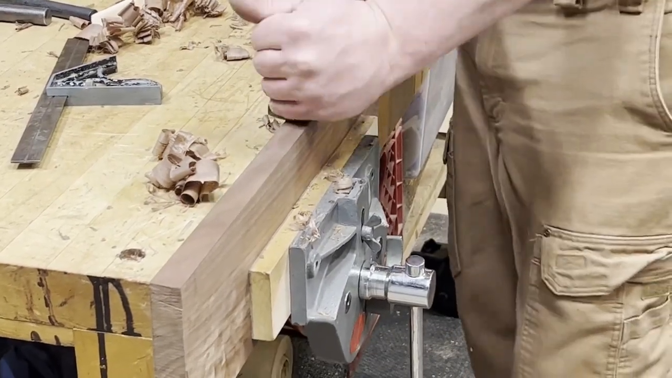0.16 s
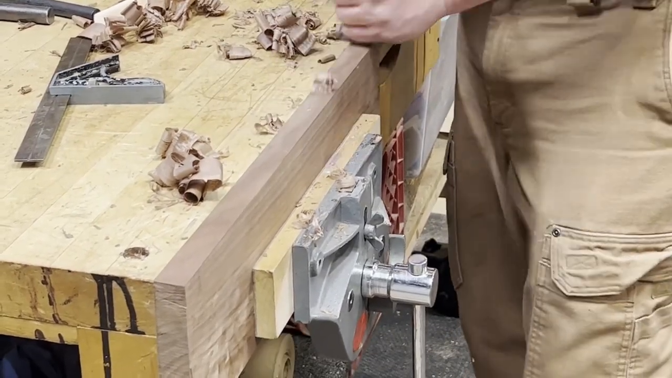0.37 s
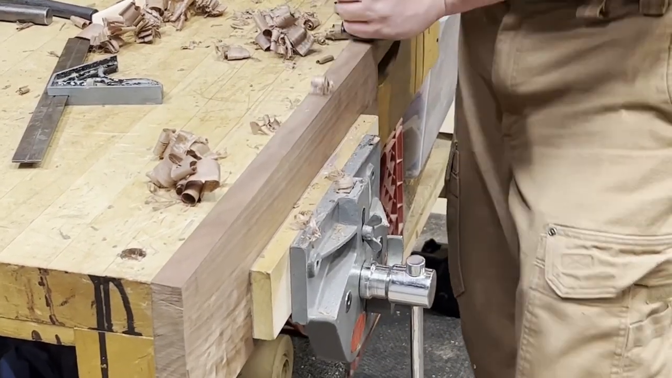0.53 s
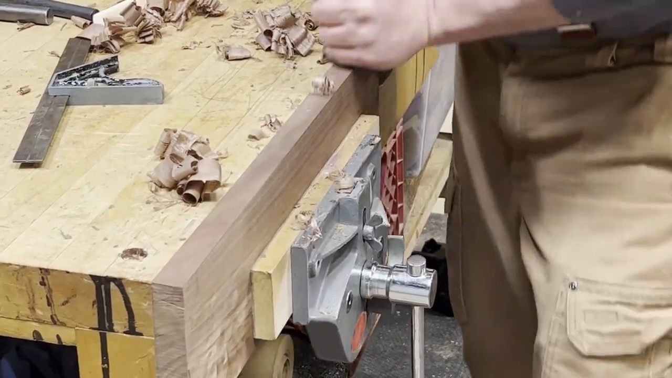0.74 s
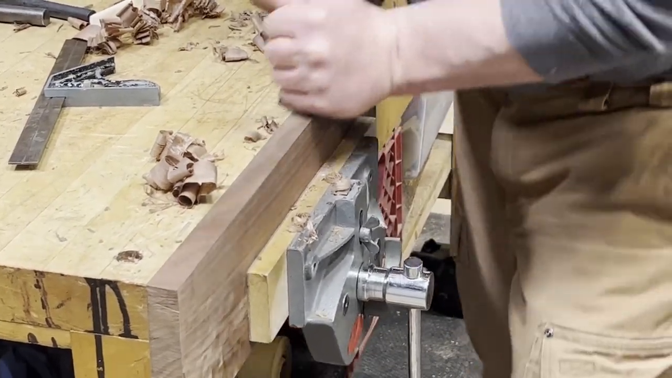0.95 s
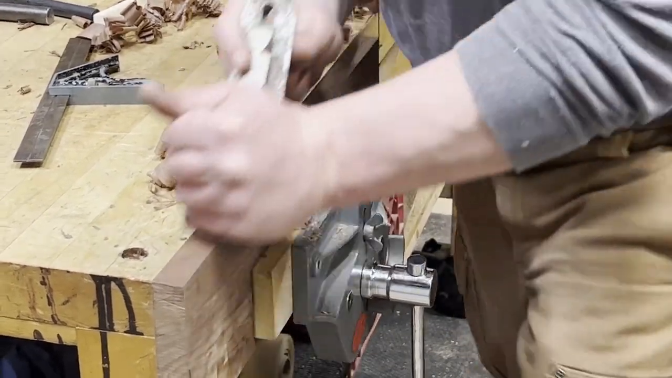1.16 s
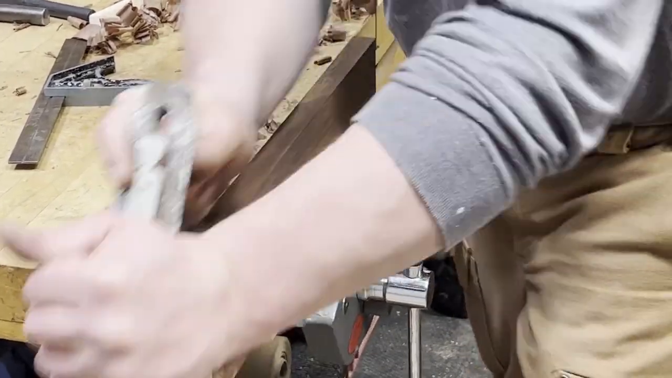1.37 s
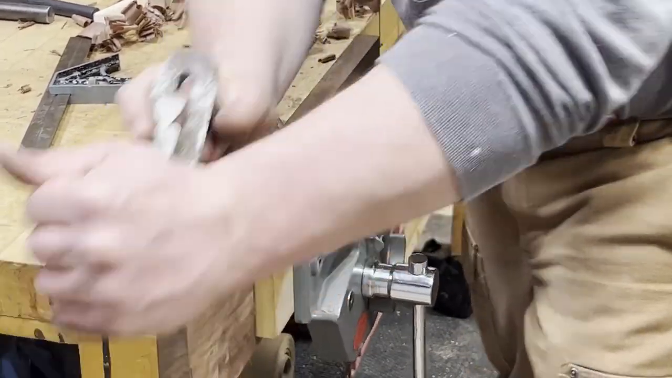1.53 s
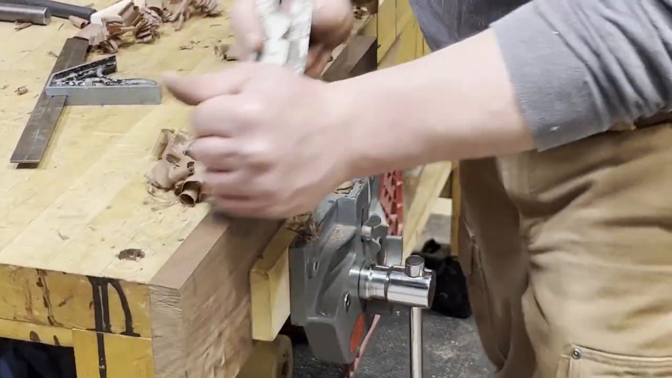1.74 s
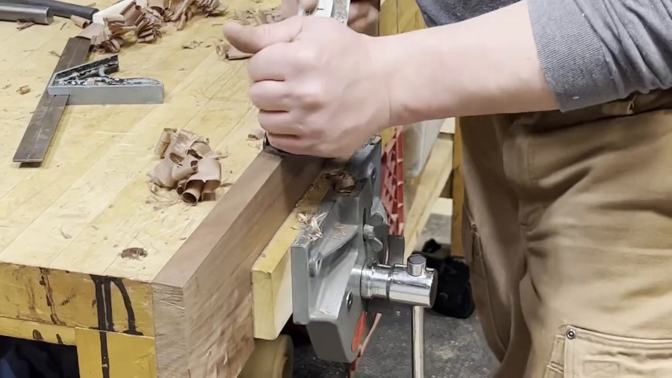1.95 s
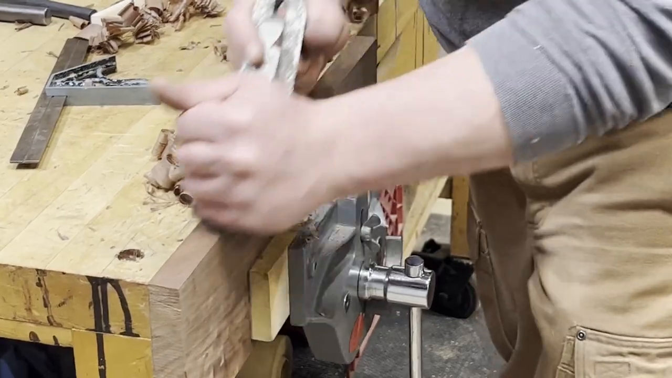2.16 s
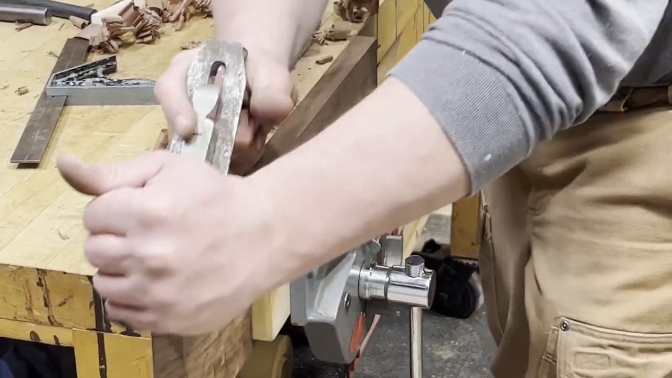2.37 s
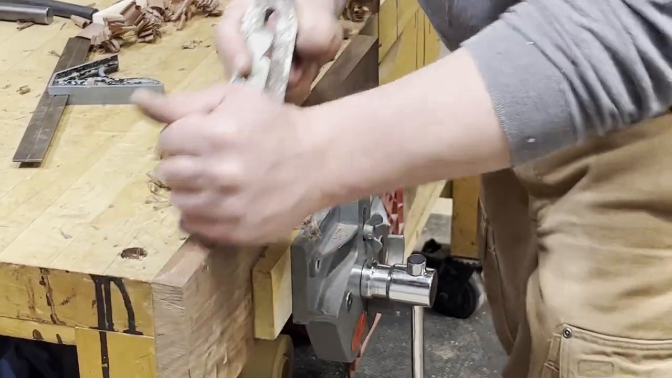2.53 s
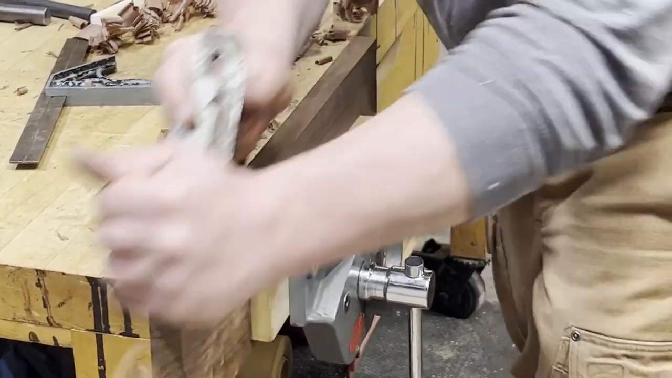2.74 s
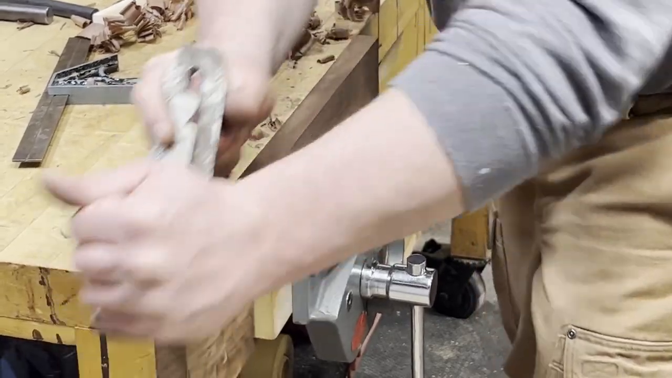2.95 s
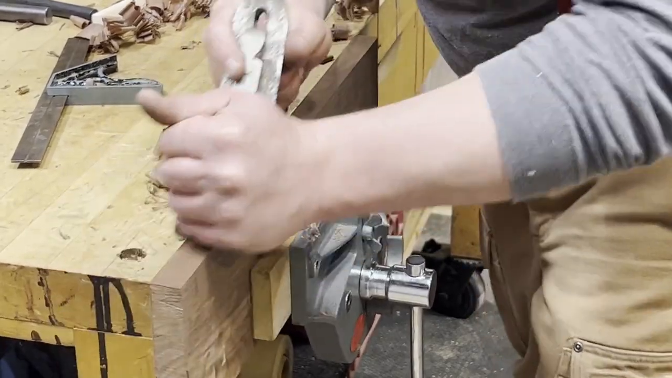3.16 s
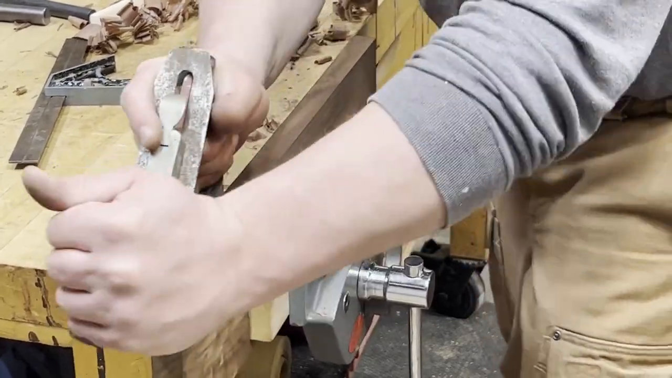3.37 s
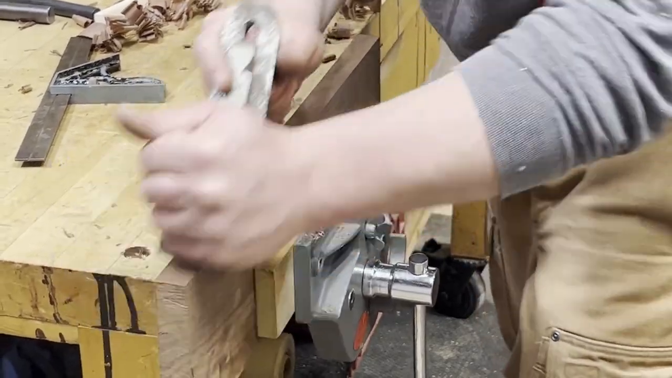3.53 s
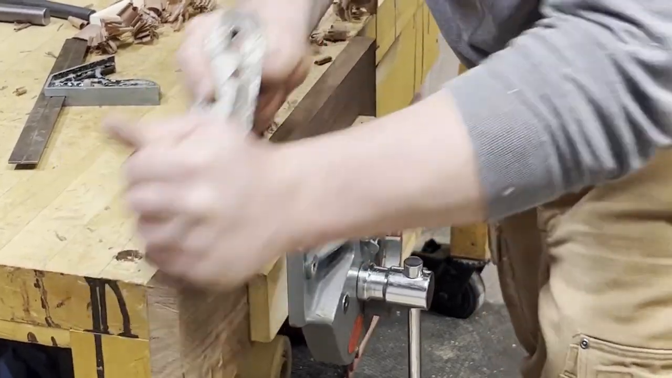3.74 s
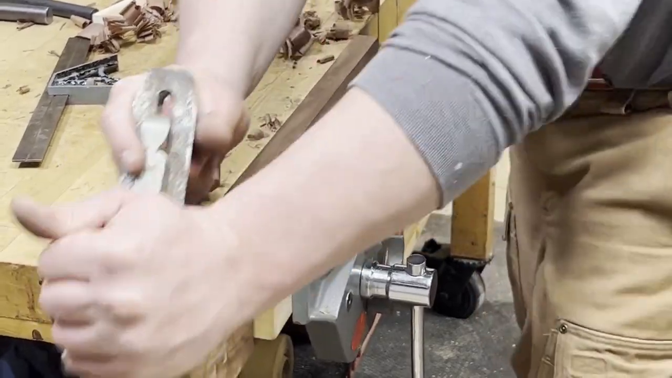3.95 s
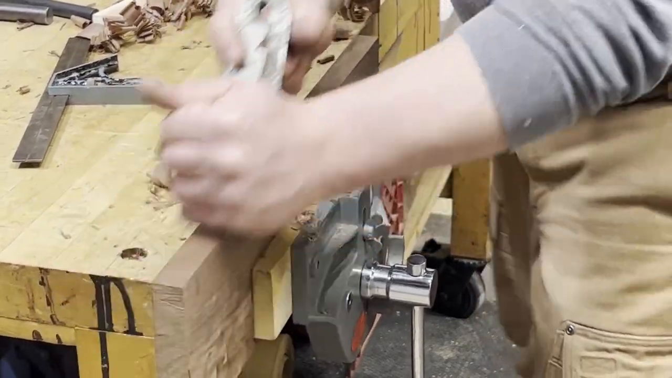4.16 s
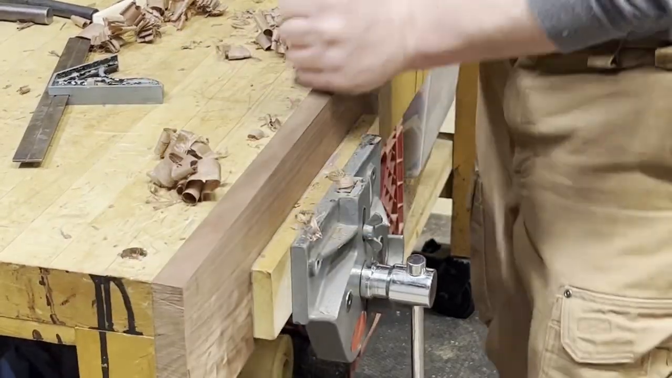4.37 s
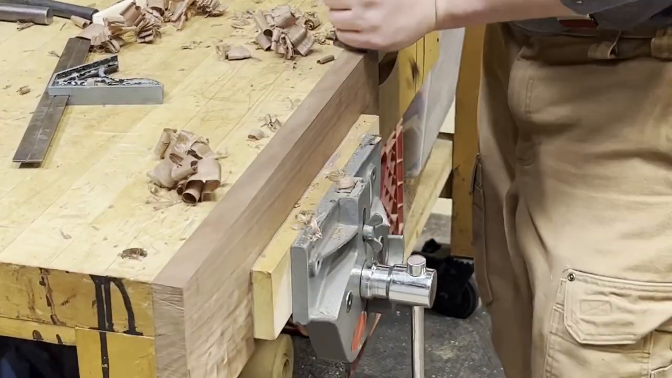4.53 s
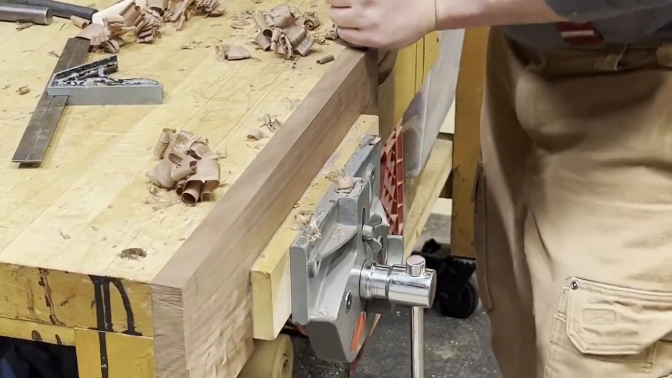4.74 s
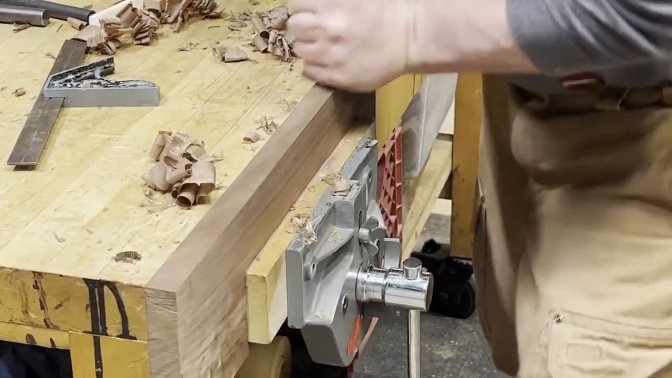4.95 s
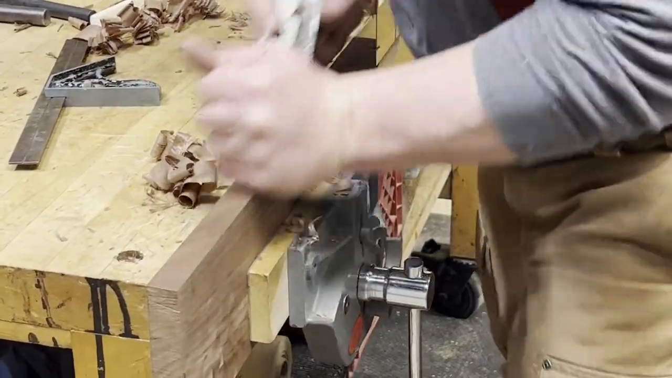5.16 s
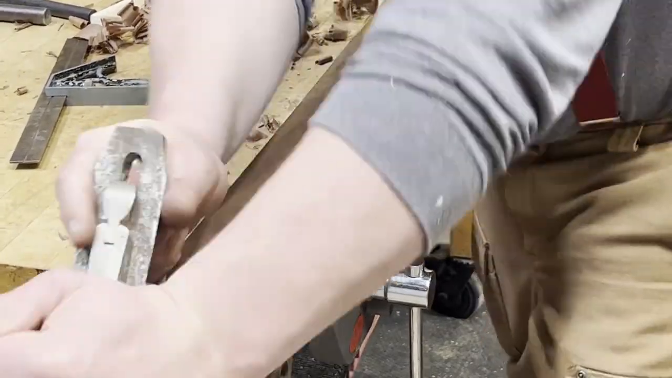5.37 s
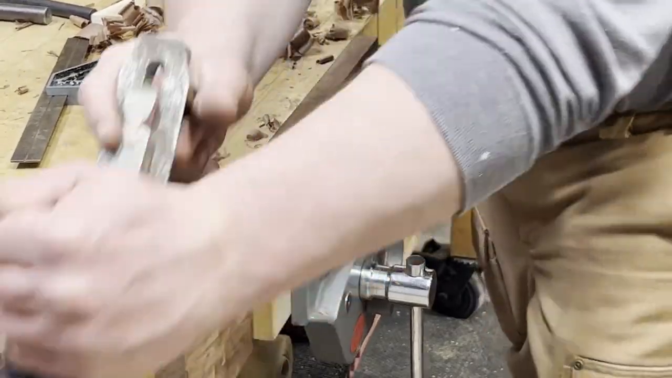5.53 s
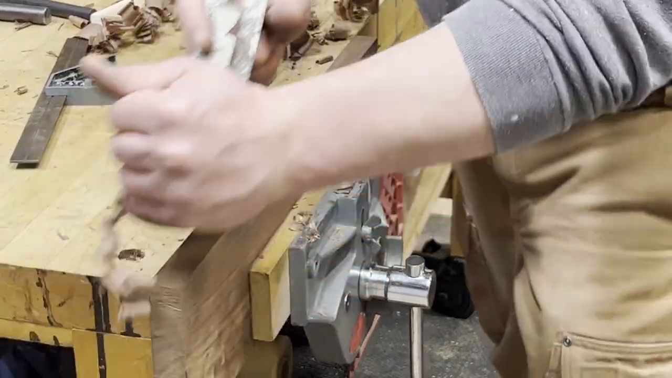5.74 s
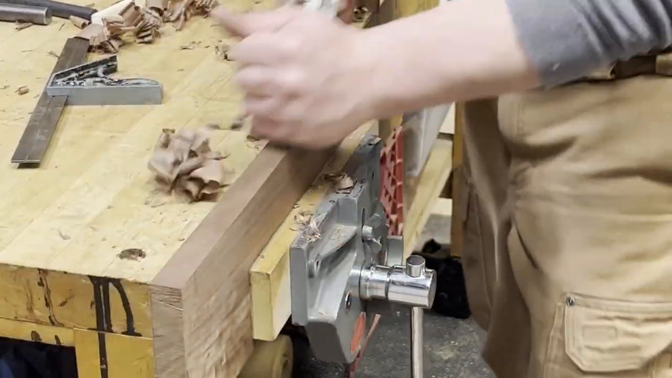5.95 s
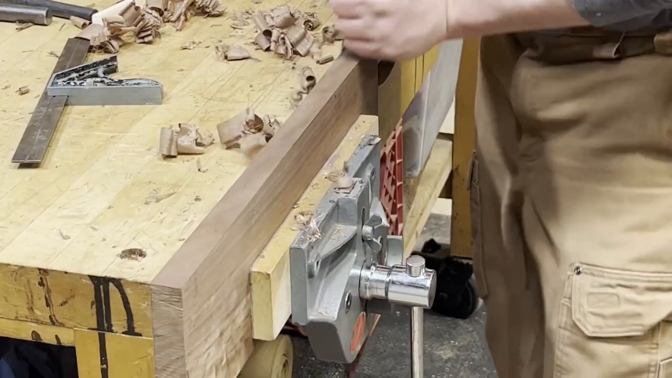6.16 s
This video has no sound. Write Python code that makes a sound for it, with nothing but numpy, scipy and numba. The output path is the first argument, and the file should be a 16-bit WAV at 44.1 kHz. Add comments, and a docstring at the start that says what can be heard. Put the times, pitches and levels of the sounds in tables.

```python
"""A hand plane works a board edge in a bench vise, close by, in a small workshop with a faint low drone of noise.
It opens in mid-cut: snapping fibres ring the iron, hiss off the shaving and chatter at a gliding pitch.
Short cuts and slides follow, the sole rasping and shaking the bench; ticks and modal knocks fall among them.
The heaviest knocks come near 1.8, 2.4 and 5.9 s, the sharpest tick at 5.3 s. A narrow-band hum swells once
from 5.6 s, and a last faint cut starts just before 6 s."""
import sys
import numpy as np
from scipy import signal
from scipy.fft import rfft, irfft, next_fast_len
from scipy.io import wavfile
from scipy.ndimage import uniform_filter1d
from numba import njit

SR = 44100
rng = np.random.default_rng(int(sys.argv[2]) if len(sys.argv) > 2 else 0)


def pcm_store(signal):
    """Save signal as 16-bit PCM."""
    levels = np.round(np.clip(np.atleast_2d(signal), -1, 1) * 32767)
    wavfile.write(sys.argv[1], SR, levels.astype(np.int16).T)


N = 273416
T = np.arange(N) / SR
SIZE = next_fast_len(N + SR // 2, real=True)  # FFT length, padded for tails
FREQ = np.maximum(np.arange(SIZE // 2 + 1) * SR / SIZE, 1)


def undb(db):
    """Decibels to gain."""
    return 10 ** (np.asarray(db) / 20)


def shape(x, response):
    """Filter by a frequency response."""
    return irfft(rfft(x, SIZE) * response, SIZE)[..., :N]


def colour(points):
    """Response through (hz, level_db) points, straight in dB over log frequency."""
    hz, level_db = np.transpose(points)
    return undb(np.interp(np.log(FREQ), np.log(hz), level_db))


def resonances(modes):
    """Response of parallel (hz, width_hz, level_db) resonances of alternating sign."""
    response = 0
    for k, (hz, width_hz, level_db) in enumerate(modes):
        detuning = (FREQ / hz - hz / FREQ) * hz / width_hz
        response = response + (-1) ** k * undb(level_db) / (1 + 1j * detuning)
    return response


def corners(low_hz, high_hz):
    """Second-order high-pass and low-pass."""
    a, b = 1j * FREQ / low_hz, 1j * FREQ / high_hz
    highpass = a * a / (1 + np.sqrt(2) * a + a * a)
    return highpass / (1 + np.sqrt(2) * b + b * b)


def unit(x):
    """Scale to rms 1."""
    return x / np.sqrt(np.mean(x ** 2))


def decay(time_s, t60_s):
    """Exponential decay by 60 dB in t60_s."""
    return np.exp(-np.minimum(np.log(1000) * time_s / t60_s, 60))


def fade(t60_s, size=N):
    """Decay from time zero."""
    return decay(T[:size], t60_s)


def add(out, x, start_s):
    """Mix x into out from start_s."""
    i = max(int(start_s * SR), 0)
    out[i:i + len(x)] += x[:N - i]


def walk(rate_per_s):
    """Smooth random wander of rms 1."""
    k = max(int(SR / rate_per_s), 1)
    steps = np.repeat(rng.standard_normal(N // k + 1), k)
    return unit(uniform_filter1d(steps, k)[:N])


def fractures(per_s, spread_db, clump_db, clump_per_s):
    """Dense tiny snaps of unequal size, bunched by the grain of the wood."""
    hits = (rng.random(N) < per_s / SR) * rng.standard_normal(N)
    snaps = hits * undb(spread_db * rng.standard_normal(N))
    return snaps * undb(clump_db * walk(clump_per_s))


def push(start_s, length_s, swell_db, attack_s, release_t60_s, arch_db):
    """Pressure of one push: a quick attack, an arched hold that swells or sags, and a release."""
    along = np.clip((T - start_s) / length_s, 0, 1)
    hold = undb(swell_db * (along - .5) + arch_db * (.5 - (2 * along - 1) ** 2))
    let_go = decay(np.maximum(T - start_s - length_s, 0), release_t60_s)
    return np.clip((T - start_s) / attack_s, 0, 1) ** 2 * hold * let_go


GRAIN_DB, GRAIN_PER_S = 3.05, 35


def grain():
    """Gain that wanders as harder and softer wood passes under the plane."""
    return undb(GRAIN_DB * walk(GRAIN_PER_S))


# spectrum of the room's drone: hz, relative_db_per_hz
DRONE_SPECTRUM = [(25, -38), (45, -17.5), (65, -5.5), (90, -7.5), (125, -10.5), (170, -17), (260, -24),
                  (500, -34.5), (1000, -41.5), (2500, -45), (6000, -55.5), (15000, -55.5)]
DRONE_DB, DRONE_WAVER_DB, DRONE_WAVER_PER_S = -50, 1.8, 16


def drone():
    """Low room noise that wavers a little, with a weak stereo difference."""
    mid, side = shape(rng.standard_normal((2, N)), colour(DRONE_SPECTRUM))
    side = undb(-18.5) * unit(side)
    level = undb(DRONE_DB + DRONE_WAVER_DB * walk(DRONE_WAVER_PER_S))
    return level * (unit(mid) + np.array([side, -side]))


HUM_S, HUM_LENGTH_S, HUM_DB = 5.58, 0.25, -63


def hum():
    """Noise through a doubled 758 Hz resonance: a narrow, wavering tone that swells and fades once."""
    tone = unit(shape(rng.standard_normal(N), resonances([(758, 63, 0)]) ** 2))
    swell = push(HUM_S, HUM_LENGTH_S, swell_db=0, attack_s=.04, release_t60_s=0.48, arch_db=2.5)
    return tone * undb(HUM_DB) * swell


def workshop(x, wet_db, side_db, air_db):
    """Short two-band room tail, the treble dying a little slower; the ports differ most in the mids."""
    noise = rng.standard_normal((2, 2, N))
    low = shape(noise[0] * fade(0.35), corners(72, 1880))
    high = shape(noise[1] * fade(0.41), corners(3800, 9000))
    tail = (low + high) * np.clip(T / 0.0026 - .5, 0, 1)  # enters from 1.3 to 3.9 ms
    tail = tail / np.sqrt(np.sum(tail ** 2, axis=1, keepdims=True))
    mid, side = shape(x, rfft(tail, SIZE))
    width = undb(side_db) * np.abs(corners(500, 990)) + undb(air_db) * np.abs(corners(4500, 9300))
    side = shape(side, width)
    return x + undb(wet_db) * (mid + np.array([side, -side]))


# modes of board, vise and bench together: hz, relative_db, t60_s
BENCH_MODES = [(121, -1.5, 0.22), (180, -3, 0.11), (275.6, -3, 0.096), (349, -1, 0.087),
               (415.6, -1.5, 0.12), (469, -2, 0.13), (699.5, -7, 0.098), (771.5, -8.5, 0.14),
               (916, -27.5, 0.21), (1023, -12.5, 0.28), (1227, -19.5, 0.14), (1348, -28.5, 0.1),
               (1527, -11, 0.076), (1730, -14.5, 0.061), (2520, -30, 0.038), (2885, -9.5, .1)]
# spectrum of the board's clatter: hz, relative_db_per_hz
BOARD_SPECTRUM = [(50, -22.5), (110, 7.5), (220, 9), (420, -7), (620, 3), (900, 2.5), (1700, 1.5),
                  (3000, -6.5), (7000, -12.5), (15000, -34.5)]
# the plane lands, stalls, judders or runs off the edge; the blow excites low_hz to high_hz:
# start_s, relative_db, low_hz, high_hz
KNOCKS = [(0.018, -33, 200, 900), (.504, -38, 500, 3000), (0.996, -22.5, 220, 450),
          (1.047, -20.5, 278, 590), (1.236, -38, 120, 795), (1.321, -19, 60, 172), (1.43, -31, 150, 900),
          (1.7604, -17, 1360, 3480), (1.763, -10.5, 282, 460), (1.779, -15, 300, 450),
          (2.066, -37.5, 89.5, 580), (2.354, -9, 217, 1040), (2.605, -35, 110, 440), (2.767, -17, 90, 210),
          (2.855, -36.5, 110, 700), (2.956, -34.5, 348, 1390), (3.109, -45, 80, 345), (3.303, -23, 92, 503),
          (3.405, -32.5, 130, 1530), (3.807, -16, 50, 146), (3.908, -31.5, 100, 1090),
          (4.147, -29.5, 354, 1390), (4.237, -23.5, 280, 380), (4.309, -17, 280, 375),
          (4.345, -20, 280, 380), (4.821, -31, 200, 1430), (5.272, -32, 100, 600),
          (5.344, -34.5, 150, 1590), (5.527, -32, 200, 1690), (5.8964, -20, 1130, 2670),
          (5.899, -12, 250, 462), (5.979, -19, 260, 463), (6.138, -27.5, 120, 497)]


def knocks():
    """Blows ring the bench; bending waves carry the treble first and the bass some milliseconds later."""
    size, out = SR // 2, np.zeros(N)
    modes = np.zeros(size)
    for k, (hz, level_db, t60_s) in enumerate(BENCH_MODES):
        modes += (-1) ** k * undb(level_db) * np.sin(2 * np.pi * hz * T[:size]) * fade(t60_s, size)
    modes = undb(3) * modes / np.abs(modes).max()
    # the many weaker modes blur into a short clatter with a longer rattle behind it
    clatter = undb(2.5) * shape(rng.standard_normal(N), colour(BOARD_SPECTRUM))
    envelope = fade(0.064, size) + undb(-13.5) * fade(0.33, size)
    for start_s, level_db, low_hz, high_hz in KNOCKS:
        i = rng.integers(N - size)
        highpass = signal.butter(2, low_hz, "high", fs=SR, output="sos")
        lowpass = signal.butter(2, high_hz, fs=SR, output="sos")
        blow = modes + clatter[i:i + size] * envelope
        add(out, undb(level_db) * signal.sosfilt(np.vstack([highpass, lowpass]), blow), start_s)
    lag_s = 0.01591 / (1 + (FREQ / 370) ** 2)
    phase = 2 * np.pi * np.cumsum(lag_s) * SR / SIZE  # group delay summed to phase
    return shape(out, np.exp(-1j * phase))


# chips crack and the iron touches the wood: start_s, relative_db
TICKS = [(.271, -44), (0.443, -47), (0.463, -51), (0.5062, -50), (0.609, -37.5), (1.043, -36.5),
         (1.466, -54), (1.76, -33), (1.909, -56), (2.063, -43), (2.356, -35.5), (2.7127, -46),
         (2.765, -41.5), (3.7846, -38), (4.312, -38.5), (4.7442, -55.5), (4.805, -43), (5.2615, -28),
         (5.754, -53), (5.896, -35)]


def ticks():
    """Short dry cracks of noise that touch the iron's resonances."""
    size, out = SR // 3, np.zeros(N)
    envelope = fade(0.033, size) + undb(-2.5) * fade(0.22, size)
    for start_s, level_db in TICKS:
        add(out, undb(level_db) * rng.standard_normal(size) * envelope, start_s)
    return shape(out, undb(-6.0) * corners(2400, 14000) * (1 + 4.5 * resonances(IRON_MODES)))


# spectrum of the sole's rasp: hz, relative_db_per_hz
SOLE_SPECTRUM = [(150, -27), (450, -2.5), (900, 8), (1700, 4), (2400, 3.5), (4000, -7.5), (9000, -17.5)]
# the sole rubs along the edge; the rumble is shaken from low_hz up:
# start_s, length_s, rasp_relative_db, rumble_relative_db, swell_db, low_hz
SLIDES = [ (-.012, 0.08, -38.5, -35, 0.5, 129), (0.117, 0.18, -49, -48, 0, 90),
          (0.261, 0.074, -40, -38.5, -9, 120), (0.38, 0.29, -54.5, -55.5, -4, 80),
          (0.593, 0.054, -44.5, -59, -2, 200), (0.715, 0.22, -34.5, -40.5, 2.5, 131),
          (0.954, 0.14, -43, -36.5, -4, 280), (1.09, 0.11, -47, -54, -3, 150),
          (1.201, .12, -39, -41.5, 10, 150), (1.362, 0.31, -49.5, -48.5, -20.5, 100),
          (1.797, 0.11, -48.5, -45, -8, 280), (1.926, 0.17, -61.5, -61, 3, 130),
          (2.079, 0.3, -45.5, -48, 3.5, 220), (2.42, 0.16, -48.5, -55, -17, 100),
          (2.63, 0.17, -48, -44, 7, 90), (2.81, 0.36, -53.5, -49.5, 10.5, 80),
          (3.205, 0.11, -39.5, -39.5, 3, 109), (3.41, 0.28, -47.5, -47, -13.5, 90),
          (3.646, 0.17, -42.5, -43, 12.5, 70), (3.9, 0.56, -54.5, -48.5, -9, 90),
          (4.25, .2, -44.5, -38, -9.5, 230), (4.81, 0.099, -41, -40, -4, 220),
          (4.896, 0.089, -29, -43, 7, 200), (5.02, 0.3, -52, -41.5, 1.5, 132),
          (5.326, .3, -53, -52, 4, 220), (5.64, 0.29, -59.5, -63.5, -1, 130),
          (5.923, 0.28, -47.5, -46, -13.5, 260)]
SLIDE_ATTACK_S, SLIDE_RELEASE_T60_S, SLIDE_ARCH_DB = 0.03, 0.23, 1.5


def sole():
    """The sole sticks and slips along the edge; the slips also shake board and bench and brush up a faint hiss."""
    slips = fractures(per_s=5500, spread_db=1.04, clump_db=1.6, clump_per_s=130) * grain()
    # broader than free ringing, whose width would be 2.2 / t60_s
    bench = resonances([(hz, 5.54 / t60_s, level_db) for hz, level_db, t60_s in BENCH_MODES])
    rasp = unit(shape(slips, colour(SOLE_SPECTRUM) * (1 + 2.6 * np.abs(bench))))
    rasp = rasp + undb(-14.5) * unit(shape(slips, colour(SHAVING_SPECTRUM)))
    body = shape(slips, (bench + undb(-21.5) * colour(BOARD_SPECTRUM)) * corners(49, 404))
    rub, rumble = np.zeros((2, N))
    for start_s, length_s, rasp_db, rumble_db, swell_db, low_hz in SLIDES:
        weight = push(start_s, length_s, swell_db, SLIDE_ATTACK_S, SLIDE_RELEASE_T60_S, SLIDE_ARCH_DB)
        rub = np.maximum(rub, undb(rasp_db) * weight)
        highpass = signal.butter(2, low_hz, "high", fs=SR, output="sos")
        rumble += undb(rumble_db) * weight * unit(signal.sosfilt(highpass, body))
    return undb(-4) * rasp * rub + undb(-2.0) * rumble


@njit
def sweep(x, hz, q):
    """Band-pass with a moving centre and even output power."""
    y, band, low = np.empty(len(x)), 0., 0.  # the two integrator states
    for i in range(len(x)):
        g = np.tan(np.pi * hz[i] / SR)
        v = (band + g * (x[i] - low)) / (1 + g * (g + 1 / q))
        band, low, y[i] = 2 * v - band, low + 2 * g * v, v / np.sqrt(g)
    return y


def glide(start_s, length_s, first_hz, turn_hz, last_hz, turn):
    """Pitch of a stroke: it eases into its turning point and speeds away from it."""
    along, turn = np.clip((T - start_s) / length_s, 0, 1), np.clip(turn, .02, .98)
    approach = (first_hz - turn_hz) * (1 - along / turn) ** 2
    departure = (last_hz - turn_hz) * ((along - turn) / (1 - turn)) ** 2
    return turn_hz + np.where(along < turn, approach, departure)


# the blade bites; its chatter follows the plane's speed, which changes course once in a stroke:
# start_s, length_s, hiss_relative_db, ring_relative_db, swell_db (hiss and ring), chatter_relative_db,
# chatter_swell_db, first_hz, turn_hz, last_hz, turn (share of the stroke, 0-1)
STROKES = [ (-.012, 0.1, -42, -33, -20, -33.5, -17, 1780, 1740, 1670, 0.6),
           (0.251, 0.069, -57, -38, -9, -40.5, 2, 1900, 1850, 1790, .5),
           (0.594, .045, -44.5, -43.5, 5, -42, -6, 1820, 1640, 1500, 0),
           (0.705, 0.063, -47.5, -43, 8, -43.5, 12, 2066, 1780, 1080, 0.5),
           (0.789, 0.14, -47.5, -42.5, 15, -34.5, 5, 950, 820, 1670, 0.07),
           (1.035, 0.19, -42, -39.5, -1, -39, 19.5, 2850, 3450, 1310, 0.49),
           (1.222, 0.097, -44, -35, 18, -38.5, -2, 1500, 1540, 3050, 0.3),
           (2.049, 0.15, -44.5, -38, 2.5, -43.5, 3, 2300, 2400, 2800, 0.5),
           (2.142, 0.17, -42.5, -29.5, 0.5, -37, 3, 2900, 2870, 1330, 0.41),
           (2.457, 0.12, -56, -47.5, -8, -50, -14, 3030, 3100, 2850, 0.1),
           (2.635, 0.053, -43, -36, 6, -42.5, 2, 2800, 2870, 3100, 0.7),
           (2.691, .077, -38.5, -37.5, 20, -41, 10, 3270, 5000, 3760, 0.8),
           (2.94, 0.11, -57, -40.5, 1, -46, 7, 3300, 3480, 2550, 0.1),
           (3.155, 0.14, -40.5, -36, -1, -37, 4, 3600, 3560, 1100, 0.13),
           (3.441, 0.15, -64, -46.5, 0, -46, -2, 1700, 3050, 2560, .35),
           (3.656, 0.075, -47, -40.5, 14, -41.5, -18, 1250, 1170, 1430, .35),
           (3.735, 0.065, -32.5, -30, 10.5, -30, -7, 4750, 5600, 2950, 0.14),
           (4.018, 0.275, -56, -42, 9, -51, -7.5, 2740, 3100, 2520, 0.46),
           (4.303, 0.16, -57.5, -42.5, -4, -39, -1, 1890, 1760, 1160, 0.44),
           (4.796, 0.055, -46, -40, -6, -42.5, 7, 1150, 910, 845, 0.4),
           (4.898, 0.29, -40.5, -32.5, 15.5, -37, -2, 1200, 1260, 3500, 0.15),
           (5.179, 0.091, -34, -41, 8.5, -40, 16, 3680, 4000, 5430, 0.88),
           (5.959, 0.19, -58, -54, -6, -48.5, -10, 3500, 2920, 2640, 0.5)]
CUT_ATTACK_S, CUT_RELEASE_T60_S, CUT_ARCH_DB = 0.021, 0.068, 2.5


def chatter():
    """A rough gliding squeak that flares up wherever it crosses a resonance of the iron."""
    pitch_hz, gain = np.ones(N), np.zeros(N)
    for start_s, length_s, _, _, _, level_db, swell_db, *course in STROKES:
        pitch_hz = np.where(T >= start_s, glide(start_s, length_s, *course), pitch_hz)
        pressure = push(start_s, length_s, swell_db, CUT_ATTACK_S, release_t60_s=0.043, arch_db=2)
        gain = np.maximum(gain, undb(level_db) * pressure)
    pitch_hz = pitch_hz * undb(0.73 * walk(200))  # jitter
    breaks = fractures(per_s=6000, spread_db=0.5, clump_db=0.0, clump_per_s=200)
    squeak = unit(sweep(sweep(breaks, pitch_hz, 4.2), pitch_hz, 2.06)) * gain
    return shape(squeak, 0.55 + 2.97 * resonances(IRON_MODES))


LINGER_DB, LINGER_T60_S = -19, 0.15


def cut(start_s, length_s, swell_db):
    """Depth of one cut, with the rustle of the shaving that lingers behind it."""
    quick = push(start_s, length_s, swell_db, CUT_ATTACK_S, CUT_RELEASE_T60_S, CUT_ARCH_DB)
    linger = push(start_s, length_s, swell_db, CUT_ATTACK_S, LINGER_T60_S, CUT_ARCH_DB)
    return np.maximum(quick, undb(LINGER_DB) * linger)


# resonances of the plane's iron and body: hz, width_hz, relative_db
IRON_MODES = [(2707, 500, -18.5), (2946, 53, 4), (3140, 19, -7), (3350, 85, -0.5), (3477, 200, -8.5),
              (3772, 42, -1.5), (6820, 220, -11.5)]
# overtones of iron, cap and lever that colour the hiss: hz, width_hz, relative_db
OVERTONES = [(4480, 90, -5), (5250, 64, -3.5), (6000, 37, 1), (6580, 110, -11), (6870, 58, -1.5),
             (7060, 67, -10.5), (8150, 69, -6.5), (8830, 110, -2), (11160, 560, 0), (12200, 120, 0),
             (12600, 170, 0.5), (14660, 160, 1)]
# hiss spectrum of the curling shaving: hz, relative_db_per_hz
SHAVING_SPECTRUM = [(500, -3), (1500, -2), (2500, -4.5), (4000, 0), (4800, -2), (6000, -2), (6800, 2),
                    (7400, 4.5), (9300, -5.5), (11300, -1.5), (12500, -14), (13250, 1.5), (13900, -16.5),
                    (15600, 1.5)]
# the blade catches on hard grain and the iron sings out: start_s, level_db
CATCHES = [(-.005, -25), (1.059, -28.5), (1.174, -28), (1.302, -37), (2.21, -36), (3.169, -44),
           (3.226, -27), (3.775, -25), (4.138, -38.5), (4.303, -36), (5.047, -28), (5.122, -24)]
CATCH_ATTACK_S, CATCH_LENGTH_S, CATCH_RELEASE_T60_S = 0.013, 0.018, .07


def blade():
    """Snapping fibres ring the iron in short bursts and hiss off the curling shaving."""
    snaps = fractures(per_s=12000, spread_db=-2.0, clump_db=0.1, clump_per_s=300)
    bursts = snaps * undb(3.0 * walk(180))
    ring = unit(shape(bursts, resonances(IRON_MODES) * corners(1700, 6300)))
    hiss_response = colour(SHAVING_SPECTRUM) * (1 + 1.63 * np.abs(resonances(OVERTONES)))
    hiss = unit(shape(snaps, hiss_response))
    bite, peel = np.zeros((2, N))
    for start_s, length_s, hiss_db, ring_db, swell_db, *_ in STROKES:  # the deepest cut governs
        depth = cut(start_s, length_s, swell_db)
        bite = np.maximum(bite, undb(ring_db) * depth)
        peel = np.maximum(peel, undb(hiss_db) * depth)
    bite = undb(-4.5) * bite * grain()
    for start_s, level_db in CATCHES:
        catch = push(start_s, CATCH_LENGTH_S, 0, CATCH_ATTACK_S, CATCH_RELEASE_T60_S, 0)
        bite = np.maximum(bite, undb(level_db) * catch)
    return ring * bite + hiss * peel


def scene():
    """Planing and knocks in the workshop, over drone and hum."""
    plane = blade() + chatter() + sole() + ticks() + knocks()
    return workshop(plane, wet_db=-10.0, side_db=1.5, air_db=-12) + drone() + hum()


# phase by which the left port leads the right: hz, lead_rad
PORTS = [(0, 0), (900, .2), (2100, 0), (3000, .6), (3800, .6), (5400, 0), (5900, -.6), (6400, 0),
         (7500, -.1), (8600, -1.1), (9200, -2.9), (10700, -3.3), (12900, -6.2), (14300, -6.4),
         (15700, -8.6)]
TOP_HZ = 15750


def record(dry):
    """Two close microphone ports differ in phase; the top is cut steeply."""
    lead_rad = np.interp(FREQ, *np.transpose(PORTS))
    heard = shape(dry, np.exp(.5j * np.array([lead_rad, -lead_rad])))
    lowpass = signal.ellip(10, .05, 60, TOP_HZ, fs=SR, output="sos")
    return signal.sosfiltfilt(lowpass, heard)


dry = scene()
out = record(dry)
pcm_store(out)
```